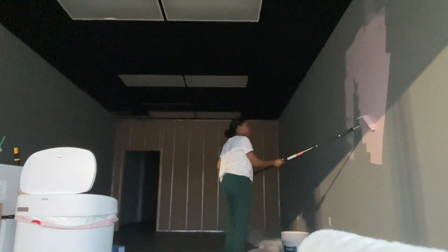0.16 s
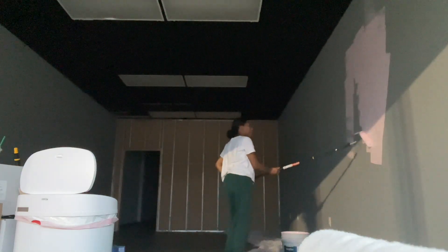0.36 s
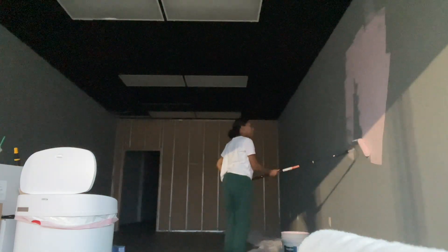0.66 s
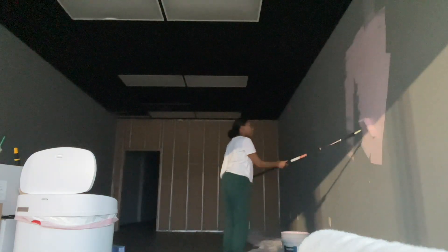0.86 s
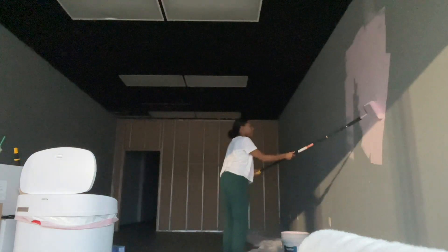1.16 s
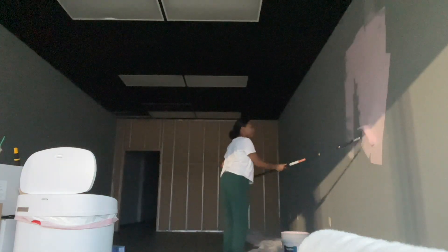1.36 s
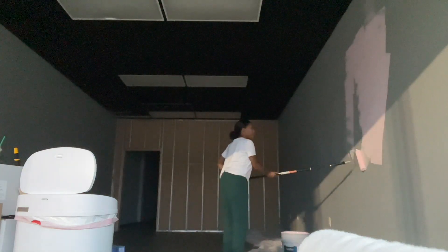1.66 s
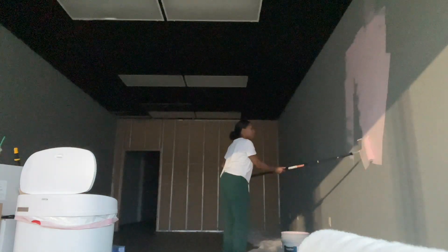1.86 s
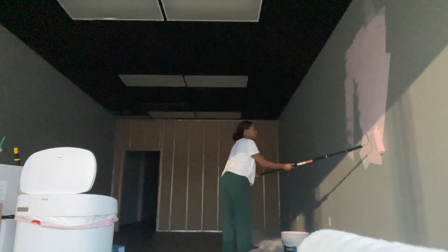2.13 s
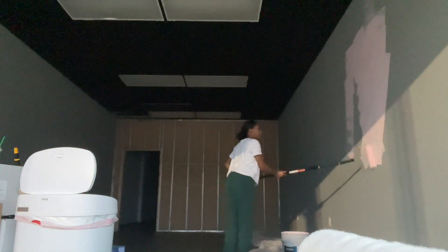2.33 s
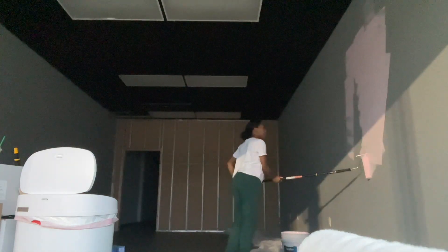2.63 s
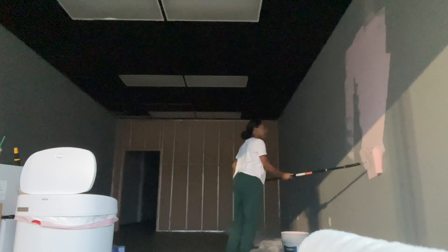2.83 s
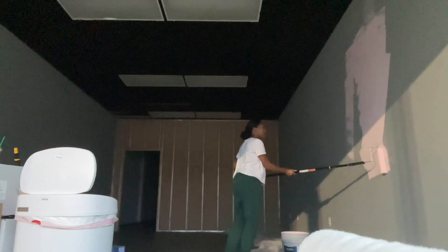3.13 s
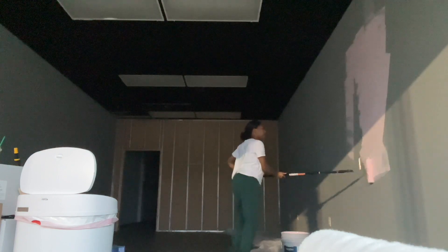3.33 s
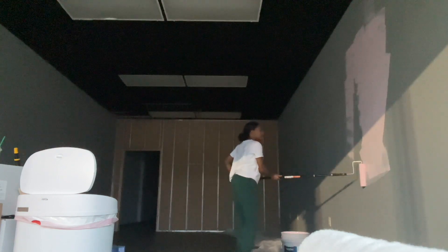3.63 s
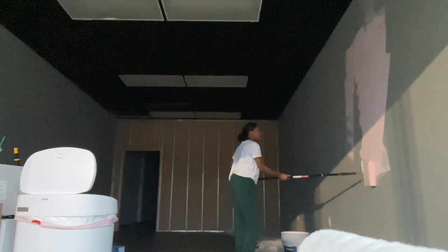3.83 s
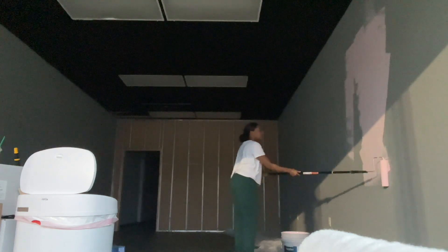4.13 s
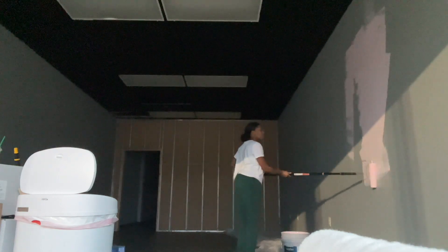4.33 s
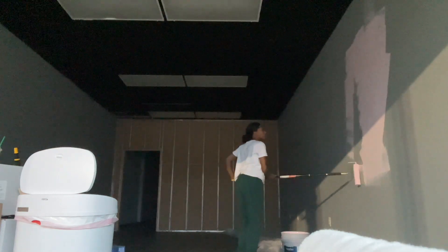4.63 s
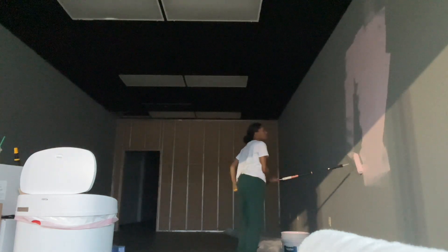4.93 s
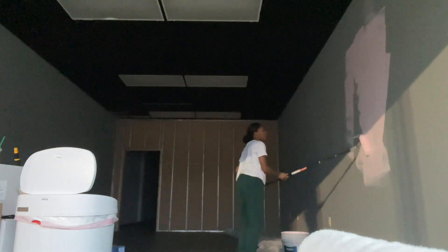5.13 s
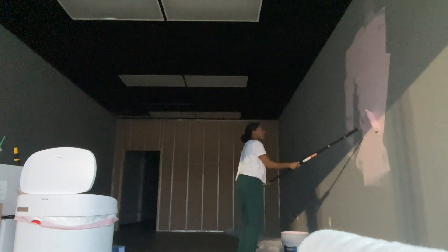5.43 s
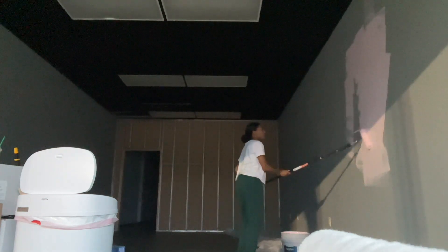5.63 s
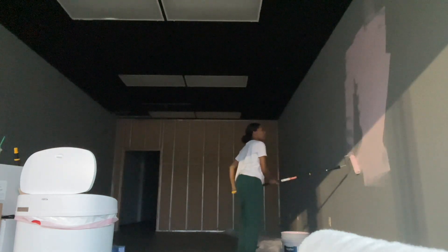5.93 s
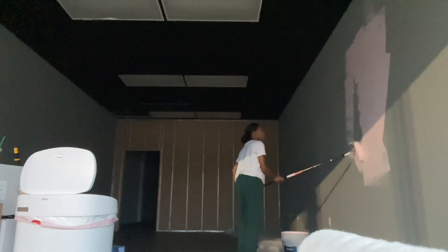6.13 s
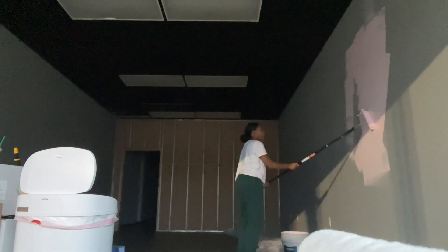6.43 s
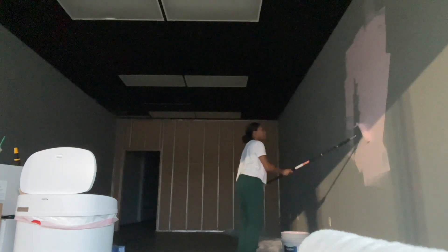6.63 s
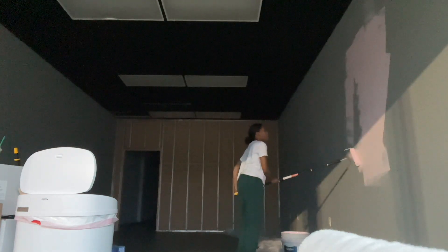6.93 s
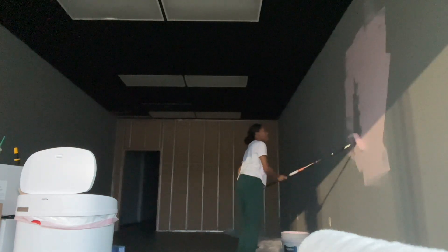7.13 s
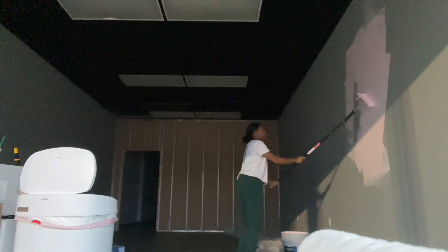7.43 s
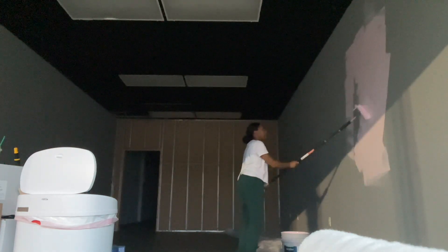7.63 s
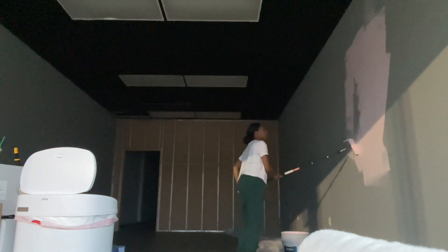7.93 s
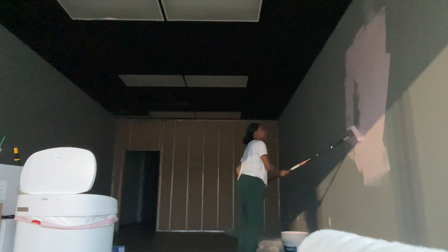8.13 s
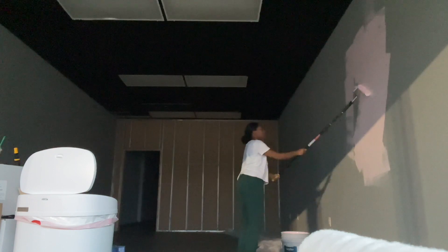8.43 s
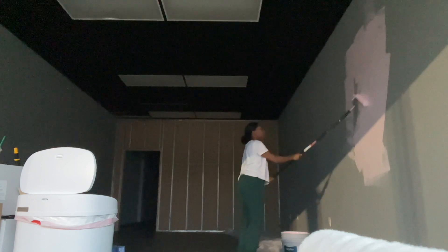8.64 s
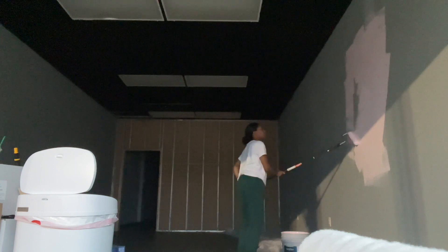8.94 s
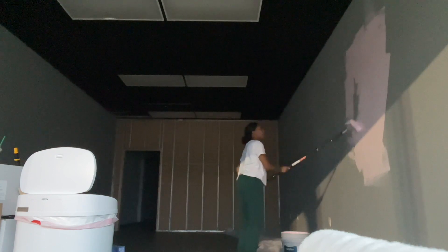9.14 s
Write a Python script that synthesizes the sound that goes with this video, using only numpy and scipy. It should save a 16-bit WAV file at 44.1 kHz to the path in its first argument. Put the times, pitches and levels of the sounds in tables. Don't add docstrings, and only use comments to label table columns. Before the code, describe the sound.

Continuous paint rolling, heard in stereo inside an empty hard-walled room. Wet nap peels from the wall in short hissing strokes, alternating heavier pushes with lighter ones. The loose cage rattles and gives woody tocks, single or double, with short floor echoes and a room tail. A few sticky smacks come at turns. Beneath lie a steady low building rumble, slowly pulsing hum and faint air hiss.

```python
import sys
import numpy as np
from scipy import signal
from scipy.fft import rfft, irfft, next_fast_len
from scipy.io import wavfile
from scipy.ndimage import uniform_filter1d, map_coordinates

SR = 44100
rng = np.random.default_rng(int(sys.argv[2]) if len(sys.argv) > 2 else 0)


def dump_mix(stems):
    frames = np.atleast_2d(stems).T
    limited = np.clip(frames, -1, 1)
    pcm = np.round(limited * 32767).astype(np.int16)
    wavfile.write(sys.argv[1], SR, pcm)


def invert_db(x):
    u = np.asarray(x, float) / 20
    return 10 ** u


N = 409236
CONTROL_STEP = 64


def unit(x):
    return x / np.sqrt(np.mean(x ** 2) + 1e-20)


def along(points, hz):
    f, v = np.transpose(points)
    return np.interp(np.log(hz + 1), np.log(f + 1), v)


def wobble(rate):
    knots = rng.standard_normal(int(N * rate / SR) + 4)
    return map_coordinates(knots, [np.arange(N) * rate / SR])


def coloured(x, spectrum, turn=1):
    m = next_fast_len(N + 8192)
    hz = np.fft.rfftfreq(m, 1 / SR)
    inside = (hz > spectrum[0][0]) & (hz < spectrum[-1][0])
    return irfft(rfft(x, m) * invert_db(along(spectrum, hz)) * inside * turn, m)[:N]


def grit(spread_db, patchy_db):
    sizes_db = spread_db * rng.standard_normal(N // 16 + 1).repeat(16)[:N]
    snaps = rng.standard_normal(N) * invert_db(sizes_db)
    z = signal.stft(snaps, nperseg=512)[2]
    over_pitch = uniform_filter1d(rng.standard_normal(z.shape), 6, 0)
    patches = unit(uniform_filter1d(over_pitch, 8, 1))
    return signal.istft(z * invert_db(patchy_db * patches), nperseg=512)[1][:N]


def clatter(rate, spread_db):
    hits = rng.random(N) < rate / SR
    return hits * rng.standard_normal(N) * invert_db(spread_db * rng.standard_normal(N))


def pluck(u, hz, life):
    swell = np.sin(np.pi * np.minimum(u / life, 1) ** 0.73) ** 2
    return swell * np.sin(2 * np.pi * hz * u)


def ports(make, mid, side, side_db, direct):
    near, diffuse = make(), make()
    share = np.clip(direct, 0, 1)
    m = unit(coloured(near, mid))
    s = share * coloured(near, side, 1j) + np.sqrt(1 - share ** 2) * coloured(diffuse, side)
    s = unit(s) * invert_db(side_db)
    return np.array([m + s, m - s])


# frequency in Hz, difference against sum in dB.
PORT_WIDTH = [(60, -57), (130, -19), (250, -11), (500, 2), (1000, 1), (2000, -2), (3300, -6)]


def widened(spectrum):
    return [(hz, db + along(PORT_WIDTH, hz)) for hz, db in spectrum]


def together(levels_db, rest_db):
    power = np.sum(invert_db(levels_db) ** 2, 0) + invert_db(rest_db) ** 2
    return 10 * np.log10(power)


def slopes(s, rise, fall):
    late = np.arange(0, N, CONTROL_STEP) / SR - np.asarray(s)[:, None]
    return np.minimum(rise * late, -fall * late)


def smooth(coarse):
    return np.interp(np.arange(N), np.arange(0, N, CONTROL_STEP), coarse)


# frequency in Hz, level in dB per Hz.
RUMBLE = [(22, -28), (33, -17), (42, 1), (62, 5), (90, 0.5), (150, -15), (250, -18.5), (380, -25),
          (470, -52)]


def building_rumble():
    rumble = ports(lambda: grit(spread_db=0.8, patchy_db=0.9), RUMBLE, widened(RUMBLE), side_db=-30, direct=0.62)
    return invert_db(-44.5) * rumble


# frequency in Hz, level in dB per Hz.
STILL_AIR = [
    [(400, 9.5), (820, -8), (980, 11), (1420, -13.5), (2010, 0.5), (3090, -22), (3500, -17), (4300, -7), (4900, -15), (7000, -28), (10300, -46), (14000, -48)],
    [(400, 9), (1400, -2), (2060, -12), (3510, -12), (5490, -8), (6600, -26), (9000, -39), (15700, -48)],
]


def still_air():
    air = ports(lambda: grit(spread_db=0.0, patchy_db=2.5), *STILL_AIR, side_db=-6.5, direct=0.94)
    return invert_db(-64.5) * air


# frequency in Hz, level in dB.
LAMP = (360, -67.5)


def lamp_buzz():
    hz, db = LAMP
    return invert_db(db - 0.5 + 4.1 * wobble(3)) * np.sin(2 * np.pi * hz * np.arange(N) / SR)


MOTOR_HZ = (58.25, 52.5)
# mean level in dB, depth from 0 to 1, period in seconds, loudest at seconds.
MOTOR_SWELLS = [
    (-38.2, .5, 4.05, 2.45),
    (-48.5, .8, 1.3, .9),
]


def motors():
    t = np.arange(N) / SR
    hum = np.zeros(N)
    for (db, depth, period, loudest), hz in zip(MOTOR_SWELLS, MOTOR_HZ):
        swell = 1 + depth * np.cos(2 * np.pi * (t - loudest) / period)
        hum += invert_db(db + 5.5) * swell * np.sin(2 * np.pi * hz * t)
    return hum


# frequency in Hz, seconds to fall by 60 dB.
ROOM_DECAY = [(150, 0.52), (900, 0.67), (3000, 1)]


def room(x):
    step = SR // 2
    out = np.zeros((2, N + 2 * SR))
    for at in range(0, N, step):
        hz, t, z = signal.stft(rng.standard_normal((2, SR // 2)), SR, nperseg=256)
        dying = invert_db(-60 * t / along(ROOM_DECAY, hz)[:, None])
        tail = signal.istft(z * dying, SR, nperseg=256)[1]
        tail *= 1 + 0.66 * np.exp(-np.arange(tail.shape[1]) / SR / 0.055)
        tail[1] = 0.96 * tail[0] + 0.52 * tail[1]
        wet = signal.fftconvolve(x[None, at:at + step], tail / np.linalg.norm(tail[0]), axes=1)
        out[:, at + 350:at + 350 + wet.shape[1]] += wet
    return out[:, :N]


# time in seconds, hiss in dB.
TEARS = [(1.17, -63), (1.21, -64), (2.19, -57.5), (2.32, -54), (3.1, -65), (3.18, -65), (3.269, -55),
         (4.33, -68), (4.83, -70), (5.53, -61), (5.645, -54.5), (5.745, -52.5), (5.841, -50.5),
         (6.55, -59.5), (7.57, -58), (8.64, -57)]


def smacks():
    s, db = np.transpose(TEARS)
    return db[:, None] + slopes(s, rise=220, fall=197)


USUAL_HISS_DB = -52
# frequency in Hz, level in dB per Hz.
SMACK_EDGE = [(7000, -12), (11000, -5), (13500, 2), (14200, -8)]


def peel():
    edge = ports(lambda: grit(spread_db=3.0, patchy_db=10.0), SMACK_EDGE, SMACK_EDGE, side_db=-6, direct=.6)
    level_db = smooth(together(2 * smacks() - USUAL_HISS_DB, -120))
    return invert_db(level_db - 14) * edge


# start in seconds, full speed at seconds, slowing from seconds,
# nap hiss in dB, push in dB.
ROLLER_STROKES = [(-.03, .08, 0.17, -54.5, -27), (0.227, 0.32, 0.52, -56, -17.5),
                  (0.643, 0.832, 0.98, -51.5, 1), (1.234, 1.292, 1.53, -50, -4),
                  (1.727, 1.852, 1.996, -51, 1.5), (2.238, 2.39, 2.44, -52, -8),
                  (2.607, 2.81, 2.872, -51.5, -0.5), (3.317, 3.345, 3.46, -54, -8.5),
                  (3.632, 3.838, 3.908, -53.5, -1), (4.397, 4.405, 4.455, -61, -13),
                  (4.503, 4.509, 4.57, -58.5, -18), (4.55, 4.62, 4.96, -73.5, -35),
                  (4.968, 5.14, 5.25, -53.5, 1), (5.617, 5.63, 5.92, -58.5, -3.5),
                  (6.002, 6.196, 6.325, -51.5, 0.5), (6.58, 6.662, 6.89, -52, -4),
                  (7.016, 7.172, 7.32, -51, 0.5), (7.57, 7.71, 7.885, -51.5, -3.5),
                  (8.055, 8.198, 8.34, -50.5, 3), (8.617, 8.74, 8.97, -52, -4),
                  (9.044, 9.173, 9.3, -52.5, -8)]


def pressed(full_db, per_push, per_hiss, rise, fall, rest_db, extra_db):
    _, full, slow, hiss_db, push_db = np.transpose(ROLLER_STROKES)
    top_db = full_db + per_push * push_db + per_hiss * (hiss_db - USUAL_HISS_DB)
    strokes_db = top_db[:, None] + slopes((full + slow) / 2, rise, fall)
    return smooth(together(np.r_[strokes_db, extra_db], rest_db))


def bump():
    return -37.5 + slopes([0], 162, 162)


# frequency in Hz, level in dB per Hz.
BOARD_COLOUR = [(62, -1.5), (95, 2), (140, -5), (210, -5.5), (270, -15), (315, -12), (355, -17), (400, -13),
                (480, -38.5)]


def board():
    level_db = pressed(full_db=-40.5, per_push=0.72, per_hiss=0, rise=49.5, fall=48,
                       rest_db=-53.5, extra_db=bump())
    return invert_db(level_db) * ports(lambda: grit(spread_db=1.34, patchy_db=2.0), BOARD_COLOUR,
                                 widened(BOARD_COLOUR), side_db=-25, direct=.5)


# frequency in Hz, level in dB per Hz.
CAGE_COLOUR = [(430, -12.5), (620, 4), (800, -0.5), (1000, 2.5), (1150, -11.5), (1500, -12)]


def rattle():
    level_db = pressed(full_db=-44, per_push=0.87, per_hiss=0, rise=88, fall=83,
                       rest_db=-70, extra_db=bump() - 16)
    return invert_db(level_db - 3) * ports(lambda: clatter(rate=900, spread_db=2.0), CAGE_COLOUR,
                                     widened(CAGE_COLOUR), side_db=-5.5, direct=0.88)


# frequency in Hz, level in dB per Hz.
RASP_COLOUR = [(1150, -10.5), (1400, -11), (1710, -6.5), (2100, 0), (2500, -3), (3150, -4.5), (3350, -16.5)]
# time in seconds, rasp in dB.
RIM_SCUFFS = [
    (.19, -53),
    (4.82, -59.5),
    (5.87, -61),
]


def rasp():
    s, db = np.transpose(RIM_SCUFFS)
    scuffs = db[:, None] + slopes(s, 87, 87)
    level_db = pressed(full_db=-50.5, per_push=0.23, per_hiss=0.68, rise=55.5, fall=48.5,
                       rest_db=-84, extra_db=np.r_[smacks() - 2, scuffs])
    scrape = ports(lambda: grit(spread_db=0.0, patchy_db=1.0), RASP_COLOUR, widened(RASP_COLOUR),
                   side_db=-3.0, direct=0.74)
    return invert_db(level_db - 1.64 + 1.03 * wobble(25)) * scrape


# time in seconds, peak in dB,
# lead of the first knock in milliseconds, first knock in dB, tick in dB.
DOUBLE_KNOCKS = [(0.8465, -29, 25, -31, -10), (.9627, -30.5, 24.9, -51, -6),
                 (1.9492, -31.5, 27.7, -36, -10), (2.8368, -26.5, 26, -30, -11),
                 (3.18, -33, 31, -38.5, -11), (3.8084, -22, 29, -26.5, -21), (3.917, -33, 20, -32.5, -12),
                 (4.4598, -32, 18.4, -39, -8), (5.1396, -25, 24, -31.5, -14),
                 (5.2461, -33.5, 26.1, -41, -4), (5.8486, -34, 22.5, -36, 0.5),
                 (6.0926, -22, 32, -30, -11.5), (6.2125, -24.5, 23.8, -27, -10.5),
                 (6.312, -31, 23.3, -30, -7), (7.1652, -24, 22, -30.5, -10.5),
                 (7.2625, -28.5, 24.9, -33, -7), (7.3515, -39.5, 22.3, -37, -5),
                 (7.8793, -35, 27.7, -41, 0), (8.1108, -29.5, 39, -41.5, -9),
                 (8.2289, -29.5, 21.6, -34, -7.5), (8.3198, -36.5, 20.6, -38, -6),
                 (8.855, -36.5, 22.4, -43.5, 3.5), (9.187, -33, 24, -38.5, -5.5)]
# time in seconds, peak in dB,
# pitch in Hz, tick in dB.
SINGLE_KNOCKS = [(.0758, -45, 560, -24), (.346, -43.5, 920, -14), (.4985, -41.5, 870, -13),
                 (.6979, -31.5, 826, -12), (1.3151, -35.5, 990, -5.5), (1.42, -32, 920, -12),
                 (1.528, -32.5, 883, -3), (1.8801, -42, 780, -10), (2.3368, -34, 945, -8),
                 (2.691, -24, 866, -15), (3.2897, -30.5, 889.5, -8), (3.4074, -30.5, 906, -10),
                 (4.35, -32.5, 940, -11), (5.0089, -26, 854, -8.5), (5.6556, -35.5, 950, -4.5),
                 (5.751, -37.5, 1051, 1), (6.123, -35, 806, -26), (6.688, -34.5, 1060, -2.5),
                 (6.7896, -34.5, 920, 3), (6.9835, -33, 880, -15), (7.6894, -38, 1070, -5),
                 (7.7839, -35, 937, 3), (8.654, -46, 832.5, 3), (8.7835, -48, 840.3, 8),
                 (1.8062, -31.5, 865, -2), (1.835, -27, 846, -12), (4.212, -46, 960, 2),
                 (4.2422, -39.5, 940, -39), (8.7437, -44, 915, 6), (8.76, -41.5, 990.7, 2)]
# time in seconds, echo in dB.
FLOOR_ECHO = [(0, 2.5), (.9, 4), (1.4, 1.5), (1.9, -2), (2.7, -6), (3.4, -12), (4.4, -8.5), (5.1, -0.5),
              (5.8, -0.5), (6.3, -2), (7.2, 2.5), (7.8, 1.5), (8.2, 7), (9.27, 10)]


def contacts():
    echo_ms, second_echo_ms = 5.12, 4.83
    first_hz, first_duller_db, second_hz = 908, -6.5, 870
    rows = [(s, db, hz, echo_ms, tick_db) for s, db, hz, tick_db in SINGLE_KNOCKS]
    for s, _, lead_ms, db, tick_db in DOUBLE_KNOCKS:
        rows.append((s - lead_ms / 1000, db, first_hz, echo_ms, tick_db + first_duller_db))
    for s, db, _, _, tick_db in DOUBLE_KNOCKS:
        rows.append((s, db, second_hz, second_echo_ms, tick_db))
    s, db, hz, ms, tick_db = np.transpose(rows)
    echo_db = np.interp(s, *np.transpose(FLOOR_ECHO))
    luck = rng.standard_normal((len(rows), 2))
    pitch = hz * (1 + .02 * luck[:, 0])
    delay = ms + 0.06 * echo_db + .2 * luck[:, 1]
    return np.c_[s, db, pitch, delay, echo_db, tick_db]


def knocks():
    out = np.zeros((2, N + SR))
    t = np.arange(2600) / SR
    rows = contacts()
    luck = rng.standard_normal((len(rows), 2))
    for (s, db, hz, echo_ms, echo_db, tick_db), (a, b) in zip(rows, luck):
        thud = invert_db(db - 16.5) * pluck(t, 140 * (1 + 0.047 * a), 0.052)
        start = round((s - .0029) * SR)
        for side, sign in enumerate((1, -1)):
            straight = (.00004 * sign, 0, tick_db)
            echo = (echo_ms / 1000 - .00006 * sign, echo_db + .5 * sign, tick_db - 6.0)
            out[side, start:start + len(t)] += thud
            for late, gain_db, sharp_db in (straight, echo):
                u = np.maximum(t[:700] - .001 - late, 0)
                tock = pluck(u, hz, 0.0042)
                tock += invert_db(-14) * pluck(u, 639, 0.0042) + invert_db(-13.5) * pluck(u, 223, 0.0078)
                tick = pluck(u, 1950 * (1 + 0.072 * b), 0.0034) + invert_db(-8) * pluck(u, 2520, 0.0032)
                out[side, start:start + 700] += invert_db(db + gain_db) * (tock + invert_db(sharp_db - 2.5) * tick)
    return out[:, :N]


CLIMBING = [1, 5, 7, 9, 10, 13, 15, 17, 19]


def hiss_level():
    start, full, slow, db, _ = np.transpose(ROLLER_STROKES)
    start_db = -12.5
    climb = (-start_db / (full - start))[:, None]
    speeding = slopes(full, 0.99, 0).clip((start - full)[:, None]) * climb
    slowing = slopes(slow, 0, 63) - 150 * slopes(slow, 0, 0.98) ** 2
    slowing[CLIMBING] *= 2.26
    turns = np.array([row[0] for row in DOUBLE_KNOCKS + SINGLE_KNOCKS]) - 0.0098
    lumps = np.exp(-(slopes(turns, 1, 1) / 0.017) ** 2).max(0) - .5
    touch = slopes(start, 200, 0)
    shape = touch + speeding + slowing + 1.5 * lumps
    return smooth(together(np.r_[db[:, None] + shape, smacks()], rest_db=-87))


# frequency in Hz, level in dB per Hz.
NAP_COLOUR = [
    [(3000, -10), (3480, -6.5), (4050, -5.5), (4300, -1.5), (4550, -4), (5580, -3.5), (7000, -0.5), (9660, -5.5), (12200, -11.5), (14100, -22.5)],
    [(3200, 4), (3400, -2), (5400, -6), (6000, -7.5), (6600, -11), (9000, -6), (14000, -5.5), (15700, -7)],
]


def nap():
    hiss = ports(lambda: grit(spread_db=1.5, patchy_db=1.25), *NAP_COLOUR, side_db=-1.5, direct=0.84)
    return invert_db(hiss_level() + 0.01 + 0.59 * wobble(25)) * hiss


def scene():
    background = building_rumble() + still_air() + lamp_buzz() + motors()
    tocks = knocks()
    echoes = invert_db(-4.0) * room(tocks.mean(0))
    wall = board() + rattle() + rasp()
    return background + echoes + peel() + wall + tocks + nap()


def low_pass(x):
    return signal.sosfilt(signal.butter(12, 15750, fs=SR, output="sos"), x)


# frequency in Hz, left minus right in dB.
PORT_LEAN = [(60, 0.0), (180, 1.0), (520, 4), (1550, -1), (4570, -1), (13500, 0.0)]


def record(dry):
    heard = []
    for port, sign in zip(dry, (1, -1)):
        tone = [(hz, sign * db / 2) for hz, db in PORT_LEAN]
        heard.append(coloured(port, [(1, 0), *tone, (SR, 0)]))
    return low_pass(np.array(heard))


dry = scene()
out = record(dry)
dump_mix(out)
```